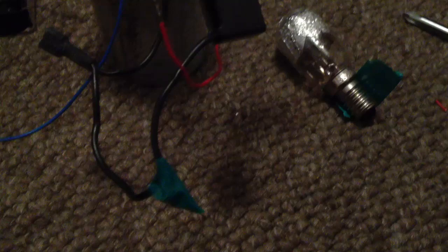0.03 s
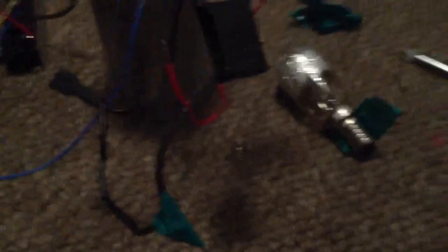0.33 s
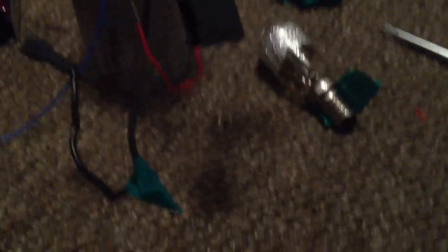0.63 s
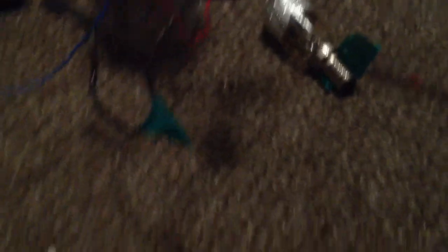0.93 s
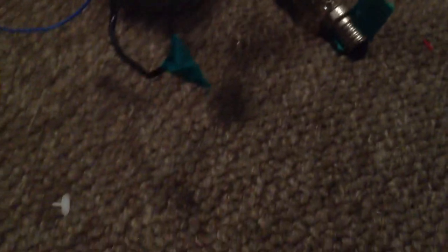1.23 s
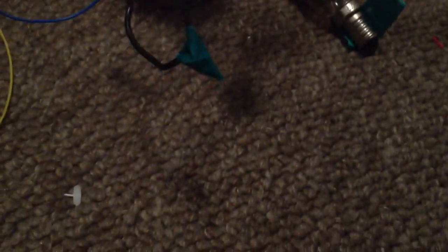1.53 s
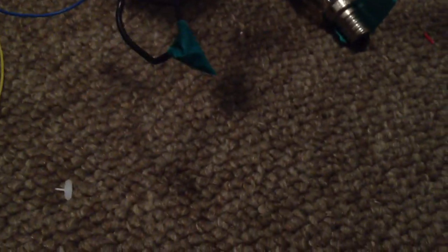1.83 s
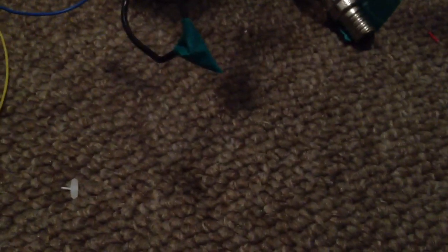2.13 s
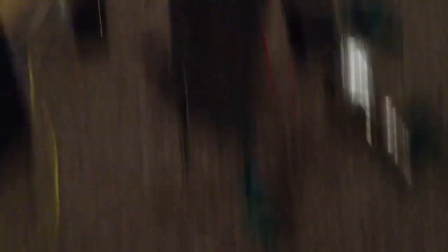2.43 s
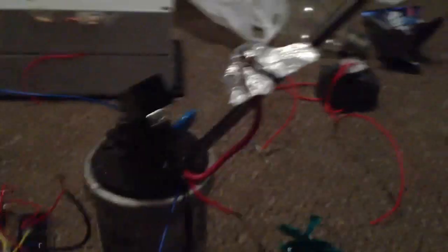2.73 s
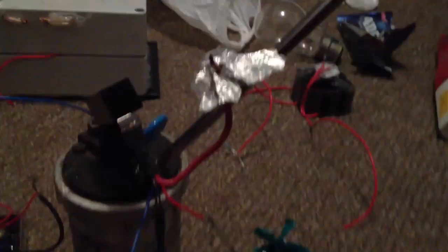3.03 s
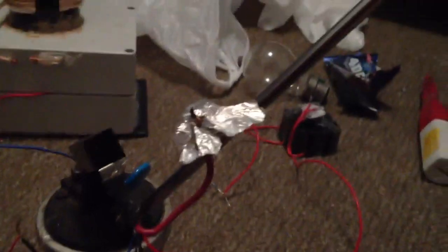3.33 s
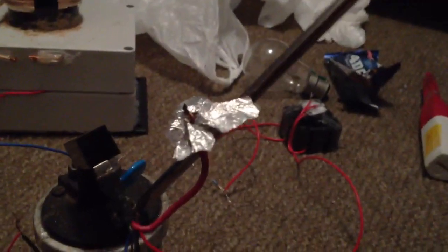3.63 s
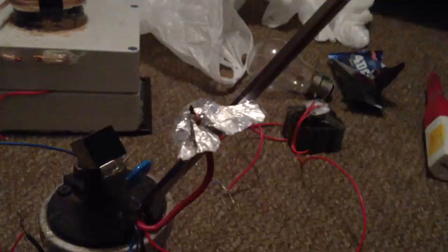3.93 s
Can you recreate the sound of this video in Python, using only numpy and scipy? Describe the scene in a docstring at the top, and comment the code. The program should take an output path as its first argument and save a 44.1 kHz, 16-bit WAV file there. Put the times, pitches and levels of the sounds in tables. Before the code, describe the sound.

One loud spark cracks as a rod shorts a capacitor. Before it come a faint sinking buzz and hum, soft handling bumps, two light knocks and a switch click, heard on a hand-held microphone in a small carpeted room.

```python
"""One sharp spark as a rod shorts a charged capacitor: a crack, ringing metal, then the room's tail.
The place is a small carpeted room, heard through the microphone of a hand-held camera.
While the capacitor charges, two oscillators buzz faintly and sink in pitch over a thin hum, a sizzle
and hiss. A switch clicks, there are two light knocks, and the camera is bumped and brushed as it moves."""
import sys
import numpy as np
from scipy import signal
from scipy.fft import rfft, irfft, next_fast_len
from scipy.io import wavfile
from scipy.ndimage import map_coordinates

SR = 44100
rng = np.random.default_rng(int(sys.argv[2]) if len(sys.argv) > 2 else 0)


def wav_out(sig):
    """Save sig, one row per channel (or a flat mono array), as 16-bit PCM at SR to the path in sys.argv[1]."""
    wavfile.write(sys.argv[1], SR, np.round(np.clip(np.atleast_2d(sig).T, -1, 1) * 32767).astype(np.int16))


N = 176400
TIME = np.arange(N) / SR
ROOM_T60_S, MIC_ROLLOFF_HZ = 0.26, 143


def amp(db):
    """Decibels to gain."""
    return 10 ** (np.asarray(db) / 20)


def unit(x):
    """Scale to rms 1."""
    return x / np.sqrt(np.mean(x ** 2) + 1e-20)


def curves(rows):
    """One value per sample for each column after the time."""
    times, *columns = np.transpose(rows)
    return [np.interp(TIME, times, column) for column in columns]


def wobble(rate):
    """A smooth random curve, rate knots a second."""
    return map_coordinates(rng.standard_normal(int(N * rate / SR) + 4), [TIME * rate])


def filtered(x, response):
    """x times a response of frequency."""
    size = next_fast_len(N + SR // 2)
    return irfft(rfft(x, size) * response(np.fft.rfftfreq(size, 1 / SR)), size)[:N]


def coloured(x, spectrum):
    """x shaped by (frequency [Hz], level [dB]) points, at rms 1."""
    points_hz, db = np.transpose(spectrum)
    return unit(filtered(x, lambda hz: amp(np.interp(np.log(hz + 1), np.log(points_hz + 1), db))))


def noise(spectrum):
    """Coloured noise of rms 1."""
    return coloured(rng.standard_normal(N), spectrum)


def fade(t, t60):
    """Silence before time 0, then an exponential decay."""
    return (t >= 0) * np.exp(-np.log(1000) * np.maximum(t, 0) / t60)


def taps(events, modes, tick_db, tick_t60, room_db):
    """Each contact rings the modes and adds a short tick; the room answers faintly."""
    direct, t = np.zeros(N + SR), np.arange(SR // 4) / SR
    attack = 1 - np.exp(-t / 0.00057)
    bass_cut = signal.butter(4, MIC_ROLLOFF_HZ, "highpass", fs=SR, output="sos")
    for start, db, treble_hz in events:
        ring = sum(amp(level + rng.normal(0, 1)) * fade(t, t60) * np.sin(2 * np.pi * hz * t)
                   for hz, level, t60 in modes)
        tick = amp(tick_db) * fade(t, tick_t60) * rng.standard_normal(len(t))
        band = np.vstack([bass_cut, signal.butter(2, treble_hz, fs=SR, output="sos")])
        direct[round(start * SR):][:len(t)] += amp(db) * signal.sosfilt(band, (ring + tick) * attack)
    tail = rng.standard_normal(len(t)) * fade(t, ROOM_T60_S)
    room = signal.fftconvolve(direct[:N], tail / np.linalg.norm(tail))[:N]
    return direct[:N] + amp(room_db) * room


# noise floor at the microphone (frequency [Hz], relative level [dB])
HISS_COLOUR = [(18, -61), (30, -25), (92, -15), (132, -3), (211, -1.5), (404, -4.5), (597, -6.5), (754, -7),
               (953, -5.5), (1110, -4), (1300, -11.5), (2370, -7.5), (2990, -9), (3590, -4.5),
               (5030, -13.5), (9890, -10), (15000, -11.5)]


def hiss():
    """A faint, steady bed of noise."""
    return amp(-67.5) * noise(HISS_COLOUR)


# a hand on the camera, right at the microphone (time [s], rub level [dB], rustle level [dB])
BRUSH_LEVELS = [(.47, -110, -105), (.52, -61, -72), (.54, -73, -70), (.56, -61.5, -62.5), (.6, -61, -63),
                (.655, -79, -68.5), (.69, -71, -68), (.74, -80, -71), (.9, -80, -70), (1.1, -100, -74)]
# a crisp scrape just after the first bump (time [s], level [dB])
SCRAPE_LEVEL = [(.165, -110), (.182, -60.5), (.205, -63), (.225, -110)]
# the three friction noises (frequency [Hz], relative level [dB])
RUB_COLOUR = [(50, -48), (100, -37), (230, -13), (300, 1.5), (380, 1), (470, -14), (660, -9.5), (1000, -20),
              (2000, -41)]
RUSTLE_COLOUR = [(60, -45), (300, -23), (900, -10), (2200, 4), (3500, -6.5), (5500, -3.5), (10000, -8),
                 (15000, -15.5)]
SCRAPE_COLOUR = [(1500, -28), (3500, -1), (5200, 4), (9000, 5), (15000, -9)]
# bumps on the camera (time [s], gain [dB], treble limit [Hz])
BUMPS = [(.1705, -49.5, 3800), (.52, -58, 1000), (.603, -57, 1700), (.627, -57, 2200)]
# its body's modes (frequency [Hz], relative level [dB], t60 [s])
CAMERA_MODES = [(195, -4.5, 0.032), (268, -2, 0.028), (890, -3.5, 0.0089), (2400, 4, 0.008),
                (3150, 11.5, 0.0054)]


def handling():
    """A hand rubs, rustles and scrapes over the camera; bumps ring its body."""
    rub_db, rustle_db = curves(BRUSH_LEVELS)
    grain_db = 1.9 * wobble(160)
    rub = amp(rub_db) * noise(RUB_COLOUR)
    rustle = amp(rustle_db + grain_db) * noise(RUSTLE_COLOUR)
    scrape = amp(curves(SCRAPE_LEVEL)[0] + grain_db) * noise(SCRAPE_COLOUR)
    return rub + rustle + scrape + taps(BUMPS, CAMERA_MODES, tick_db=8, tick_t60=0.012, room_db=-38)


# light knocks in the room (time [s], gain [dB], treble limit [Hz])
KNOCKS = [(1.561, -50, 6000), (1.751, -59, 7000)]
# what they ring (frequency [Hz], relative level [dB], t60 [s])
KNOCK_MODES = [(310, -9.5, 0.037), (745, -1, 0.022), (1305, -2, .035), (1580, -3.5, 0.026),
               (2455, -5, 0.034), (3850, -1, .012)]


def knocks():
    """Two soft contacts, each ringing briefly."""
    return taps(KNOCKS, KNOCK_MODES, tick_db=-3, tick_t60=.008, room_db=-11)


# the hum's fundamental (time [s], frequency [Hz])
HUM_PITCH = [(.9, 370), (1.5, 361), (1.8, 363.5), (2.25, 361.7), (2.5, 358), (2.7, 366), (3.0, 363),
             (3.5, 362.3), (3.68, 365), (3.9, 361.5)]
# its partials (harmonic [number], base level [dB])
HUM_PARTIALS = [(1, -88), (2, -85), (3, -79.5), (5, -87.5)]
# its swell at the microphone (time [s], gain [dB])
HUM_SWELL = [(.1, -15), (1.1, -3.5), (1.6, -2), (1.85, 2), (2.42, 3.5), (2.6, -4), (3.1, 1), (3.55, 0.5),
             (3.9, -1.5)]
# sizzle, heard close to the capacitor (time [s], level [dB])
SIZZLE_LEVEL = [(0, -92), (2.3, -83), (2.52, -69.5), (2.7, -70.5), (3.3, -70), (3.9, -70)]
# its resonances (frequency [Hz], width [Hz], relative level [dB])
SIZZLE_BANDS = [(6070, 630, -6), (7290, 550, -1), (7920, 700, -3), (13800, 540, -1.5), (15200, 120, -9)]


def hum_and_sizzle():
    """A wavering hum, and narrow bands of noise that pulse in step with it."""
    def resonances(hz):
        return sum(amp(db) / (1 + (2 * (hz - centre) / width) ** 2)
                   for centre, width, db in SIZZLE_BANDS)

    pitch = curves(HUM_PITCH)[0] * (1 + 0.00311 * wobble(25.3))
    phase = 2 * np.pi * np.cumsum(pitch) / SR
    partials = sum(amp(db + 2.4 * wobble(12)) * np.sin(k * phase) for k, db in HUM_PARTIALS)
    hum = amp(curves(HUM_SWELL)[0]) * np.sqrt(2) * partials
    sizzle = amp(curves(SIZZLE_LEVEL)[0]) * unit(filtered(rng.standard_normal(N), resonances))
    return hum + sizzle * (1 + .2 * np.cos(phase))


def buzz(rate_curve, spectrum, spread_s, jitter_s=3e-6, flutter_db=.8):
    """One tick per oscillator cycle; the transformer's core spreads each into a short chirp."""
    cycles = np.cumsum(curves(rate_curve)[0]) / SR
    centres = np.interp(np.arange(1, int(cycles[-1])), cycles, np.arange(N))[:, None]
    chance = rng.standard_normal((len(centres), 2))
    centres += jitter_s * SR * chance[:, :1]
    samples = centres.astype(int) + np.arange(-7, 9)
    pulses = np.sinc(samples - centres) * amp(flutter_db * chance[:, 1:])  # ticks fall between samples
    ticks = np.bincount(np.clip(samples, 0, N - 1).ravel(), pulses.ravel(), N)
    chirps = filtered(ticks, lambda hz: np.exp(-2j * np.pi * spread_s * hz ** 2 / SR))
    return coloured(chirps, spectrum)


def whine(rate_curve, harmonic, level_db):
    """One clean partial of an oscillator, flickering a little."""
    phase = 2 * np.pi * harmonic * np.cumsum(curves(rate_curve)[0]) / SR
    return np.sqrt(2) * amp(level_db + 1.3 * wobble(5.5)) * np.sin(phase)


# the high and the low oscillator (time [s], pulse rate [Hz])
HIGH_RATE = [(.08, 404.6), (.33, 400.8), (.5, 398), (.75, 394.5), (.9, 392.5), (1.4, 390.5), (1.9, 389.5),
             (2.5, 385), (2.75, 386), (3.1, 383), (3.45, 381), (3.9, 377.5)]
LOW_RATE = [(.08, 358), (1.3, 360), (1.7, 357), (1.9, 355.7), (2.15, 353), (2.45, 351.5), (2.75, 353),
            (3.0, 349.5), (3.4, 349), (3.6, 345), (3.9, 344)]
# their buzzes (frequency [Hz], relative level [dB])
HIGH_COLOUR = [(300, -37), (800, -14), (1190, -6), (1600, -11), (2000, -10), (2380, -5), (2820, -10),
               (3200, -6), (3620, -7.5), (4000, -7.5), (4450, -16), (5600, -6), (6500, -3), (7400, -1),
               (8600, 2), (9700, -5), (10400, -14), (11600, -7), (12800, 3), (13600, -10), (14500, -16)]
LOW_COLOUR = [(300, -22), (1400, -15), (2100, -14), (2500, -5.5), (3400, -9.5), (3900, 2.5), (4600, -10.5),
              (6200, -10), (7400, 1), (8800, -2.5), (9700, -0.5), (10400, -23), (13700, 0), (15000, 0)]
# the buzzes as the microphone moves (time [s], high level [dB], low level [dB])
BUZZ_LEVELS = [(.08, -70.5, -81), (.3, -69, -92), (.6, -69.5, -79), (1.0, -74.5, -76.5), (1.5, -83, -73.5),
               (2.3, -92, -72), (2.6, -81, -71), (3.9, -77, -74.5)]
# whining partials (time [s], high's 10th [dB], high's 25th [dB], low's 7th [dB])
WHINE_LEVELS = [(.1, -81, -94, -100), (.7, -91, -82, -100), (1.2, -81, -79, -85), (1.7, -81, -83, -79),
                (2.2, -81, -83, -80), (2.7, -81, -80, -92), (3.2, -89, -86, -83), (3.65, -78, -88, -90),
                (3.9, -80, -98.5, -82)]
# the high one's strongest partials, microphone close (harmonic [number], level [dB])
NEAR_PARTIALS = [(6, -78), (7, -76), (8, -81), (9, -80)]
# their fade with distance (time [s], gain [dB])
NEAR_FADE = [(.1, -3), (.3, 0), (.55, -5), (.85, -7.5), (1.2, -13), (1.6, -28)]
# the low one's strongest partials (harmonic [number], level relative to its buzz [dB])
LOW_PARTIALS = [(6, -17), (8, -15), (9, -14.5), (10, -15.5), (12, -11)]


def oscillators():
    """Two charging oscillators buzz and whine, slowly sinking in pitch."""
    high_db, low_db = curves(BUZZ_LEVELS)
    high = amp(high_db) * buzz(HIGH_RATE, HIGH_COLOUR, spread_s=.0007)
    low = amp(low_db) * buzz(LOW_RATE, LOW_COLOUR, spread_s=0.00182)
    high_10th_db, high_25th_db, low_7th_db = curves(WHINE_LEVELS)
    near_db, = curves(NEAR_FADE)
    high += whine(HIGH_RATE, 10, high_10th_db) + whine(HIGH_RATE, 25, high_25th_db)
    low += whine(LOW_RATE, 7, low_7th_db)
    high += sum(whine(HIGH_RATE, k, db + near_db) for k, db in NEAR_PARTIALS)
    low += sum(whine(LOW_RATE, k, db + low_db) for k, db in LOW_PARTIALS)
    return high + low


# the switch's contacts (time [s], gain [dB], treble limit [Hz])
SWITCH_CLICKS = [(2.0076, -39, 14000), (2.0088, -32, 15000), (2.0238, -49, 5000), (2.038, -43, 2400),
                 (2.0418, -53, 3000)]
# its modes (frequency [Hz], relative level [dB], t60 [s])
SWITCH_MODES = [(840, -14, .016), (1024, -15.5, 0.021), (1330, -14.5, 0.024), (2460, -1, 0.018),
                (2480, -6, 0.012), (3400, -9, .016), (3940, -12, 0.019), (4830, -9.5, 0.013),
                (5650, -13, .012), (7440, -9, 0.015), (8100, -10, .011), (9860, -17, 0.023),
                (11200, -9, .01), (12100, -16, .012)]


def switch():
    """A bright double contact, then three softer, duller ones."""
    return taps(SWITCH_CLICKS, SWITCH_MODES, tick_db=-8, tick_t60=0.014, room_db=-15)


# the spark at the microphone (frequency [Hz], relative level [dB])
CRACK_COLOUR = [(600, -3), (1000, -7), (1700, -12), (2400, -1.5), (3200, -8.5), (4900, -2), (5700, -15),
                (6400, -3), (7300, -6.5), (8500, -1.5), (10700, -1), (11700, -10), (13000, -2), (15000, -6)]
SCATTER_COLOUR = [(350, -64), (600, -30), (1440, -18), (2250, 5), (3460, -32), (4230, -50), (5920, -29),
                  (6420, 2), (10000, 0), (10600, 2), (15000, 8.5)]  # reflections off things close by
THUMP_COLOUR = [(20, -16), (55, -10), (85, -13), (130, -2), (300, -19), (600, -11), (1500, -29)]
ROOM_COLOUR = [(88, -66), (150, -40), (312, -30), (674, -39), (850, -16.5), (972, -25), (1180, -18.5),
               (2100, -12), (2270, -9), (2970, -18), (4720, -10.5), (5400, -8), (15000, -3)]
# modes of the capacitor can, rod and foil (frequency [Hz], relative level [dB], t60 [s])
METAL_MODES = [(163, -27, .04), (380, -18, 0.024), (1510, -15, 0.016), (2180, -11.5, 0.019),
               (2690, -8, 0.017), (3910, -7, 0.013), (4870, -3, 0.011), (6370, -16.5, 0.057),
               (8316, -19, 0.082), (8760, -21, .08), (10700, -16.5, .07)]


def spark(at_s=3.9257, hold_s=0.0015, swing_hz=615, swing_width_s=0.00088, room_rise_s=0.0078):
    """A crack rides on one pressure swing; metal rings; reflections, a thump and the room follow."""
    t = TIME - at_s
    crack = noise(CRACK_COLOUR) * (t >= 0) * fade(np.maximum(t - hold_s, 0), t60=0.009)
    swing_t = t - 0.00098  # centred just after the crack begins
    swing = amp(3) * np.sin(2 * np.pi * swing_hz * swing_t) * np.exp(-(swing_t / swing_width_s) ** 2)
    ring = -sum(amp(db) * np.sin(2 * np.pi * hz * t) * fade(t, t60) for hz, db, t60 in METAL_MODES)
    ring = signal.sosfilt(signal.butter(3, MIC_ROLLOFF_HZ, "highpass", fs=SR, output="sos"), ring)
    scatter = amp(1) * noise(SCATTER_COLOUR) * fade(t, t60=0.037)
    thump = amp(-24) * noise(THUMP_COLOUR) * fade(t, t60=.05)
    room = amp(-11.5) * noise(ROOM_COLOUR) * fade(t, ROOM_T60_S) * np.clip(t / room_rise_s, 0, 1)
    return amp(-12) * (crack + swing + ring + scatter + thump + room)


def scene():
    """Everything that reaches the microphone, in mono."""
    return (spark() + oscillators() + hum_and_sizzle() + switch() + knocks() + handling() + hiss())[None]


def record(dry):
    """The camera's microphone opens a moment late; peaks are rounded and the top treble is cut."""
    start_s, ceiling, top_hz = .083, .75, 15300
    opened = dry[0] * np.clip((TIME - start_s) / .002, 0, 1)
    rounded = opened / (1 + np.abs(opened / ceiling) ** 6) ** (1 / 6)
    return filtered(rounded, lambda hz: np.clip((top_hz - hz) / 350 + .5, 0, 1))[None]


dry = scene()
out = record(dry)
wav_out(out)
```